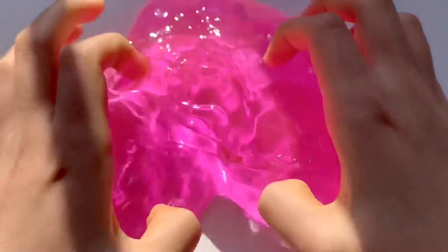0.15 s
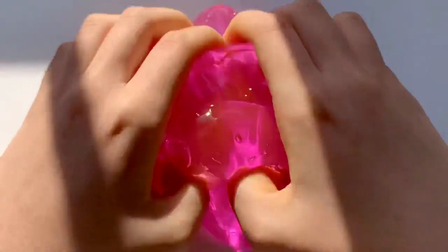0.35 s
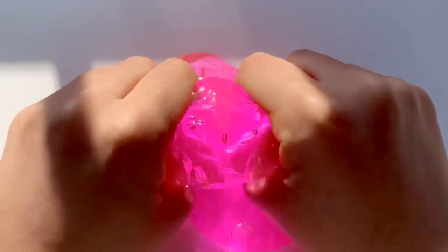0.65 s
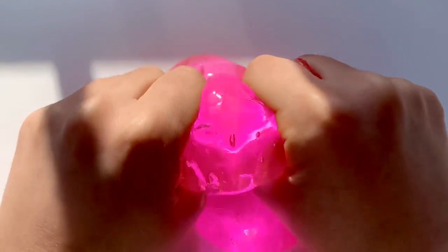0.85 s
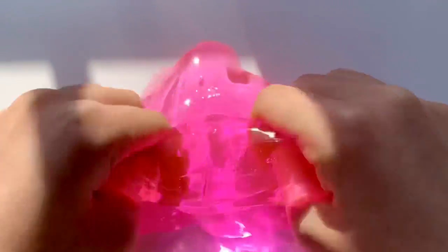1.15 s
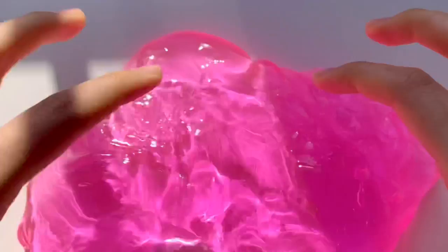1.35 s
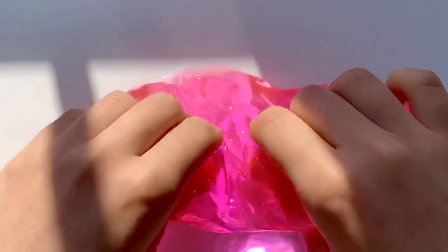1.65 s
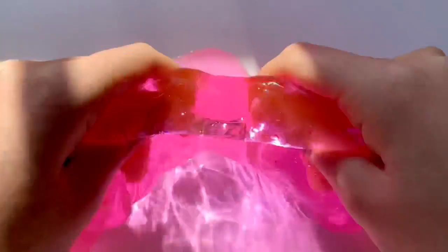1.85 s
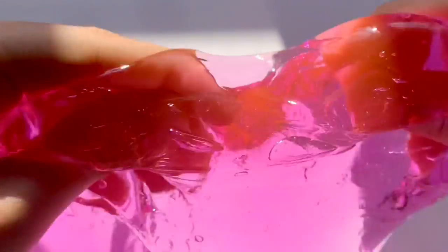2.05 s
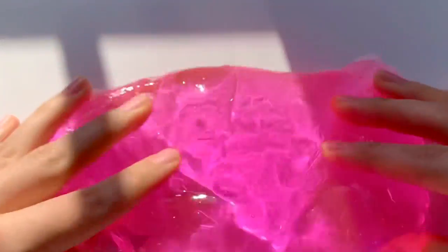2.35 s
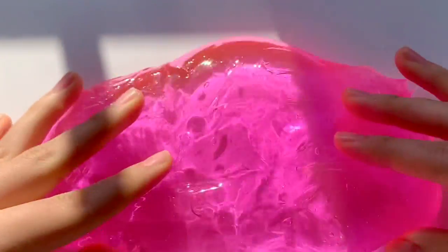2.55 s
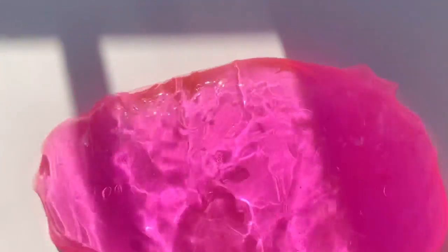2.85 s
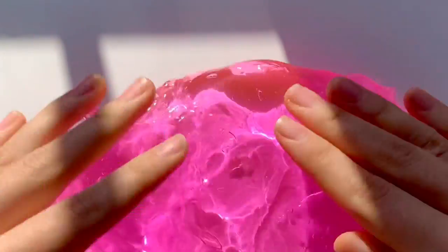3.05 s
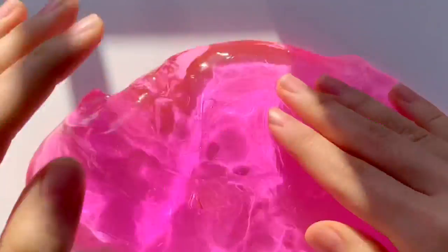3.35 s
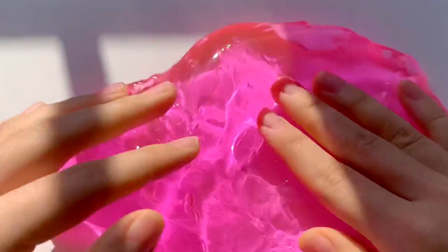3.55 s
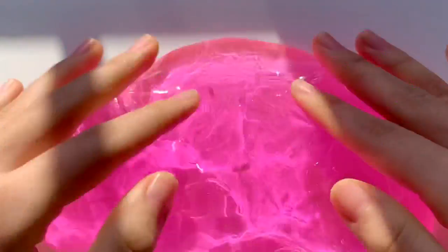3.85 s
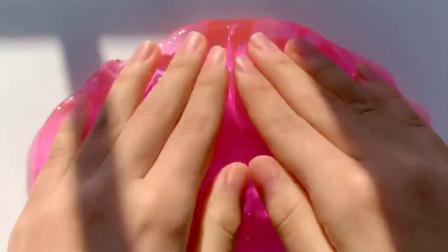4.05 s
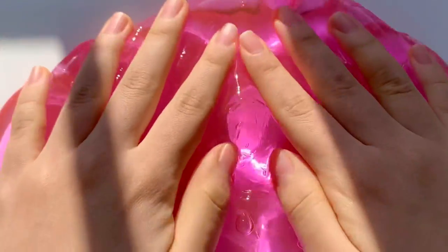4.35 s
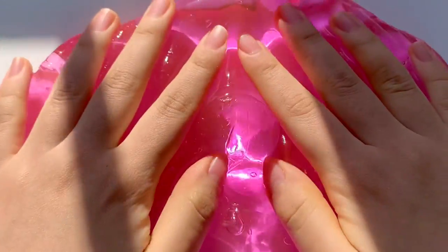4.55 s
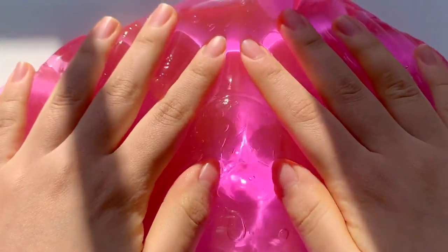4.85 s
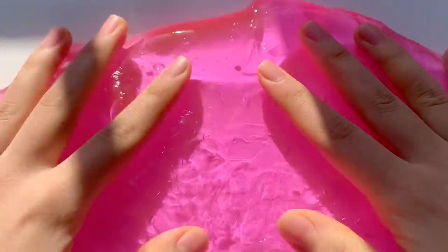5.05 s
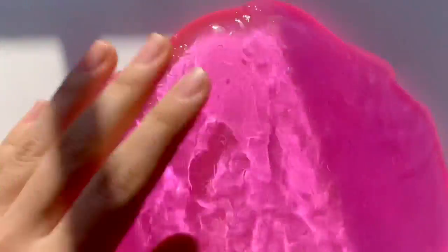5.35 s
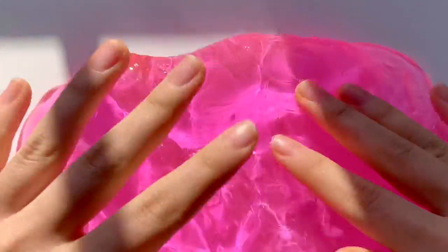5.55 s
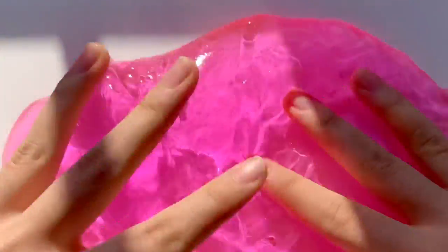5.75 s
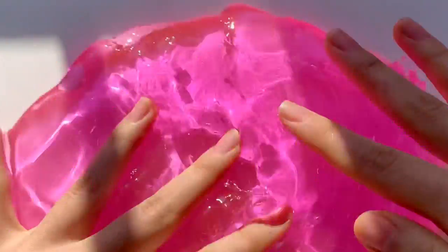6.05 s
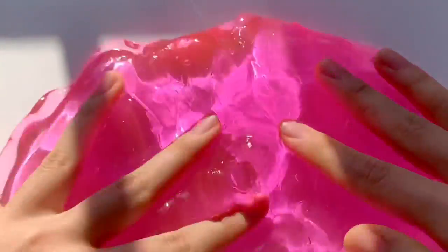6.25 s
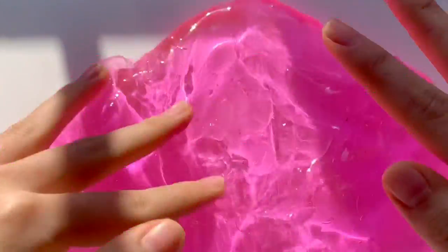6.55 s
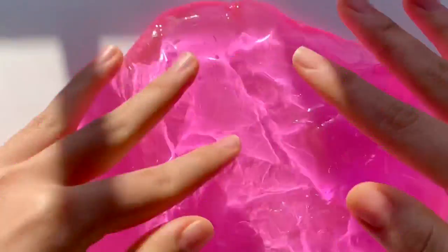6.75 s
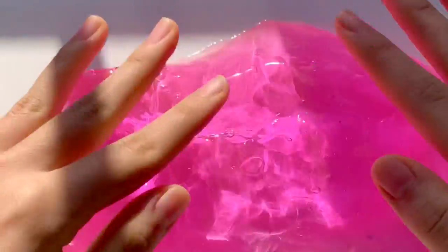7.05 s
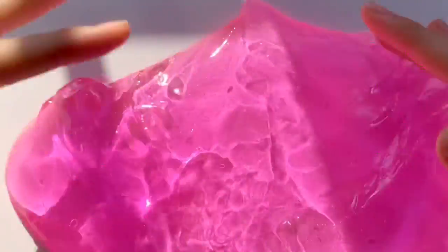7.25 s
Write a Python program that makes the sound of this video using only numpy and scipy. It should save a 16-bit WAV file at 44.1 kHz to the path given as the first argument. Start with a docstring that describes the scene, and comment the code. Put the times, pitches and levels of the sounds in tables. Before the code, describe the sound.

Hands knead and press wet slime on a table. Faint sticky crackles and squelches come first, then bright snapping films and hollow air pops arrive in quick clusters with soft low thuds. A pause follows around the middle, then a denser, louder run of crackling to the end. Close stereo microphone in a quiet small room.

```python
"""Wet slime on a table

Fingers pat, press and peel off a sheet of wet slime on a table, close to a small stereo recorder.
Sticky films snap as spikes with ringing noise, air pockets pop as damped tones or spatter, and the
wet skin sizzles and squelches as shaped noise. Each pat thuds through the modes of the table top.
Noise tails answer from the walls, over a low rumble, a wavering drone and the hush of a quiet room."""
import sys
import numpy as np
from scipy import signal
from scipy.fft import rfft, irfft, next_fast_len
from scipy.io import wavfile
from scipy.ndimage import map_coordinates

SR = 44100
rng = np.random.default_rng(int(sys.argv[2]) if len(sys.argv) > 2 else 0)


def wav_out(sig):
    """Save sig, one row per channel (or a flat mono array), as 16-bit PCM at SR to the path in sys.argv[1]."""
    wavfile.write(sys.argv[1], SR, np.round(np.clip(np.atleast_2d(sig).T, -1, 1) * 32767).astype(np.int16))


N = 326781


def amp(db):
    """Gain of a level in dB."""
    return 10 ** (np.asarray(db) / 20)


def unit(x):
    """Scaled to rms 1."""
    return x / np.sqrt(np.mean(x ** 2) + 1e-20)


def along(points, hz):
    """Values at hz, read between (Hz, value) points on a log frequency axis."""
    f, values = np.transpose(points)
    return np.interp(np.log(hz + 1), np.log(f + 1), values)


def curves(rows):
    """One value per sample for each column after the time."""
    s, *columns = np.transpose(rows)
    return [np.interp(np.arange(N) / SR, s, column) for column in columns]


def wobble(rate):
    """A smooth random curve, rate knots a second."""
    knots = rng.standard_normal(int(N * rate / SR) + 4)
    return map_coordinates(knots, [np.arange(N) * rate / SR])


def filtered(x, response):
    """x times a complex response of frequency."""
    m = next_fast_len(x.shape[-1] + 4096)
    spectrum = rfft(x, m) * response(np.fft.rfftfreq(m, 1 / SR))
    return irfft(spectrum, m)[..., :x.shape[-1]]


def hiss(spectrum, alike):
    """Shaped stereo noise of rms 1; alike is the correlation of the two sides."""
    a, b = filtered(rng.standard_normal((2, N)), lambda hz: amp(along(spectrum, hz)))
    turn = np.arccos(alike) / 2
    left = np.cos(turn) * a + np.sin(turn) * b
    right = np.cos(turn) * a - np.sin(turn) * b
    return unit(np.array([left, right]))


def place(s, rows, pan_db):
    """One row of sound at each time; what is louder on the left also gets there first."""
    right_lag = np.round(np.clip(pan_db, 0, 6) * 1.6).astype(int)  # samples
    at = np.round(s * SR).astype(int)[:, None] + np.arange(rows.shape[1])
    sides = []
    for index, db in [(at, pan_db / 2), (at + right_lag[:, None], -pan_db / 2)]:
        panned = rows * amp(db)[:, None]
        sides.append(np.bincount(index.ravel(), panned.ravel(), N + SR)[:N])
    return np.array(sides)


# Films tearing off the skin, the ones that stand out.
# Each row: tear in seconds, level in dB, ring of the little cavity in Hz.
FILM_SNAPS = [(.055, -40, 4650), (.1204, -37.5, 5500), (.2271, -20, 6660), (.2724, -32, 7040),
              (.2818, -12, 7200), (.3879, -39, 7300), (.4296, -41, 14800), (.486, -39, 9300),
              (.9526, -40.5, 13600), (1.025, -42, 6400), (1.0393, -30, 7540), (1.0628, -38, 8300),
              (1.105, -37, 3220), (1.1609, -44, 3900), (1.179, -47, 7100), (1.3117, -37, 4800),
              (1.3484, -40, 5700), (1.3898, -38, 3700), (2.0008, -14.5, 7500), (2.0578, -35, 9200),
              (2.0716, -31.5, 8700), (2.0832, -12, 6550), (2.0856, -10, 10500), (2.456, -28.5, 3700),
              (2.8548, -15.5, 10300), (2.859, -3.5, 9500), (2.8641, -15, 8950), (2.8956, -12.5, 7900),
              (2.9375, -21, 9100), (2.9408, -11, 10100), (2.9646, -22, 4100), (2.9946, -21, 7250),
              (3.0941, -15, 10500), (3.102, -24, 10500), (3.1122, -27, 12800), (3.1468, -35, 3470),
              (3.1648, -31, 10900), (3.1708, -22.5, 9200), (3.2262, -43, 11700), (3.2961, -43, 5800),
              (3.3236, -2.5, 8900), (3.3668, -18.5, 8600), (3.3846, -21.5, 8600), (3.5862, -11, 10900),
              (3.5905, 3.5, 10200), (3.603, -9.5, 7400), (3.608, -28, 9800), (3.6254, -13, 4330),
              (3.6486, -20, 8000), (3.7044, -36, 10960), (3.9197, -13, 9900), (3.9382, -9, 14400),
              (3.9516, -7.5, 8380), (4.313, -52, 11030), (4.3422, -48, 8360), (5.257, 0.5, 12800),
              (5.2616, -3, 12300), (5.3685, -6.5, 8900), (5.376, 7, 11200), (5.4596, -7, 11000),
              (5.4832, -21.5, 4260), (5.5996, -0.5, 13300), (5.611, -14.5, 8400), (5.6622, -26.5, 10500),
              (5.6822, -18.5, 8600), (5.6876, -18.5, 5100), (5.8025, -21, 8400), (5.8133, -11, 11200),
              (5.825, -10, 5130), (5.8379, -15, 4500), (5.8881, -12, 11100), (5.911, -16.5, 9050),
              (5.9212, -12.5, 4200), (5.9375, -24, 5030), (6.0373, -16.5, 6200), (6.0452, -10, 12300),
              (6.062, -14, 6840), (6.1028, -15, 11300), (6.1438, -20, 5600), (6.2695, -8, 9600),
              (6.2892, -19.5, 4560), (6.297, -8.5, 6660), (6.3241, -22, 9700), (6.363, -28, 6200),
              (6.4114, -35.5, 4900), (6.495, 4.5, 7100), (6.501, -8, 11400), (6.5173, -7.5, 4670),
              (6.5385, -18.5, 8000), (6.7508, -23.5, 14200), (6.7583, -.5, 12100), (6.7704, -13.5, 7900),
              (6.8167, -19, 3820), (6.9538, -16.5, 14100), (6.9832, -17.5, 7150), (6.9916, 0, 11100),
              (7.0017, -22, 10200), (7.0107, -10, 5200), (7.0641, -34, 6820), (7.2798, -45.5, 3810),
              (7.3656, -32, 5100)]
TEAR_T60_S, TEAR_SPREAD = .011, .3  # typical decay by 60 dB, and its log scatter
SOFT_EDGE_S = .008  # room for the soft edge ahead of the spike


def snaps():
    """A film tears: a spike in a short burst of noise, coloured by its cavity."""
    s, db, hz = np.transpose([*FILM_SNAPS, *crackle(count=350)])
    scatter, pan_db = rng.standard_normal((len(s), 2)).T
    t60 = TEAR_T60_S * np.exp(TEAR_SPREAD * scatter)
    t, cavity = np.arange(1536) / SR - SOFT_EDGE_S, hz[:, None]
    after = np.clip(t, 0, None)
    tear = amp(-60 * after / t60[:, None]) + 0.74 * amp(-60 * after / 0.0013)
    tear = tear * (1 - np.exp(-after / 0.00008))
    soft_edge = 0.25 * amp(-60 * np.abs(t) / .014)
    burst = rng.standard_normal((len(s), len(t))) * (tear + soft_edge)
    burst = burst + 4 * np.exp(-((t - .0004) / .00003) ** 2)  # the instant of rupture

    def ring(f, width):
        return 1j * f * width * cavity / (cavity ** 2 - f * f + 1j * f * width * cavity)

    def colour(f):
        thin = (1j * f / (1800 + 1j * f)) ** 2  # takes the body out below 1800 Hz
        return (.1 + 1.6 * ring(f, 0.22) + 3.5 * ring(f, 0.41)) * thin

    rows = filtered(burst, colour)
    rows = rows / np.abs(rows).max(axis=1, keepdims=True)
    return place(s - SOFT_EDGE_S, rows * amp(db + 0.5)[:, None], 2.5 * pan_db)


CRACKLE_DB, CRACKLE_SPREAD_DB = 10, 3.5  # least level over the sizzle, and the random excess


def crackle(count):
    """Small tears at random moments that follow the sizzle of the strokes: rows like FILM_SNAPS."""
    low, high = [.01, np.log(3500), 1e-3], [N / SR, np.log(13000), 1]
    s, log_hz, size = rng.uniform(low, high, (count, 3)).T
    sizzle_db = 20 * np.log10(strokes()[0][(s * SR).astype(int)] + 1e-9)
    db = sizzle_db + CRACKLE_DB - CRACKLE_SPREAD_DB * np.log(size)
    return np.transpose([s, db, np.exp(log_hz)])


# Air pockets bursting in the slime.
# Each row: burst in seconds, level in dB, pitch in Hz, decay by 60 dB in seconds,
# left over right in dB, share of clear tone from 0 to 1.
POCKET_POPS = [(0.2998, -33.5, 4770, 0.024, -15.5, 1), (1.105, -41, 3510, 0.018, -9, 1),
               (1.161, -47, 2640, 0.063, -9, 0.04), (1.388, -33, 2660, 0.095, 2.5, 0),
               (1.9749, -36, 1710, 0.04, 5, 0), (1.9982, -26, 2960, 0.063, 4, 0.02),
               (2.082, -12, 2750, 0.04, 4, 0.2), (2.4545, -31, 2180, 0.041, 3, 0.2),
               (2.881, -37, 1640, 0.22, 12.5, 0.08), (2.8962, -32.5, 1570, 0.053, -16, 0.03),
               (2.943, -29, 1554, 0.048, -3, 0.25), (2.9645, -22, 2860, 0.012, -6, 0.25),
               (2.9931, -28, 1720, 0.027, -3, 0.1), (3.044, -45, 745, 0.031, 4, 1),
               (3.094, -27.5, 2470, 0.039, 4.5, 0), (3.173, -29, 2020, 0.011, -5, 0.4),
               (3.227, -37.5, 1540, 0.014, 2, 0.04), (3.323, -22.5, 3000, 0.032, 4, 0.13),
               (3.334, -28, 3000, 0.02, 0.5, 0.3), (3.367, -11.5, 1600, 0.012, -5, 0.15),
               (3.404, -32.5, 1590, 0.052, -5, 0), (3.4316, -35, 1470, 0.023, 6, 0.2),
               (3.5903, 1, 1533, 0.01, 2, 0.09), (3.5973, -17.5, 1490, 0.048, -5, 0.06),
               (3.6258, -19, 1900, 0.015, 2, 0.9), (3.6464, -12, 1880, 0.033, 4, 0.3),
               (3.9302, -24, 1570, 0.026, 4.5, 0), (3.94, -20.5, 1910, 0.014, -11.5, 0.4),
               (3.9498, -7, 3080, 0.014, 1.5, 0.2), (3.9517, -5.5, 1620, 0.02, 1.5, 0.1),
               (4.4239, -47, 2205, 0.0091, -3, 0.17), (5.2538, -22, 1130, 0.046, 3, 0),
               (5.258, -24, 620, 0.027, 9, 0.35), (5.2832, -26.5, 1890, 0.022, 9, 0.9),
               (5.375, -16.5, 1830, 0.033, 1, 0.25), (5.3805, -29.5, 865, 0.038, 13, 0.5),
               (5.4048, -17, 1650, 0.009, 1.5, 0.3), (5.4061, -30, 1060, 0.039, 3.5, 0.6),
               (5.4565, -19.5, 850, 0.035, 3, 0.04), (5.4826, -30, 1544, 0.11, 3.5, 0.06),
               (5.6016, -20.5, 1530, 0.061, 1, 0), (5.6313, -18.5, 1760, 0.014, -2, 0.93),
               (5.6982, -28.5, 1870, 0.039, 4.5, 0.2), (5.7384, -46, 785, 0.048, 7, 0.5),
               (5.816, -23, 1815, 0.044, -5.5, 0.17), (5.825, -25, 2300, 0.032, 1, 0.2),
               (5.8379, -29, 1600, 0.023, -1.5, 0.3), (5.886, -36, 920, 0.07, 8, 0.13),
               (5.9202, -17.5, 2000, 0.039, 6, 0.04), (6.041, -33.5, 890, 0.039, 8, 0.47),
               (6.0449, -27.5, 1990, 0.039, -7, 0.08), (6.061, -12, 2500, 0.017, 4.5, 0.04),
               (6.1042, -32, 1280, 0.035, 3, 0.4), (6.147, -23, 1804, 0.047, 4, 0.1),
               (6.2705, -29.5, 810, 0.041, 12, 0.4), (6.273, -23, 1140, 0.067, -6.5, 0),
               (6.2965, -26, 1770, 0.014, 24, 0.3), (6.324, -26.5, 1220, 0.024, 6, 0.23),
               (6.3558, -29.5, 1530, 0.063, -17, 0), (6.3634, -9.5, 1530, 0.0042, 6.5, 0.23),
               (6.5228, -11.5, 1740, 0.012, 1.5, 0.7), (6.7588, -12.5, 1930, 0.0097, -5.5, 0.63),
               (6.7884, -19, 2300, 0.012, 12, 0.3), (6.8162, -21.5, 1860, 0.022, 16.5, 0.02),
               (6.9548, -24.5, 1680, 0.01, -4.5, 0.01), (6.984, -18, 1350, 0.0063, -17, 0),
               (6.9937, -26, 1550, 0.027, 3.5, 0.6), (7.0147, -17, 1130, 0.06, 4, 0),
               (7.017, -21, 1835, 0.03, -6.5, 1), (7.267, -31, 2700, 0.027, 2, 0)]


def pops():
    """A pocket rings as a damped tone rising as its mouth opens, or spatters around that pitch."""
    s, db, hz, t60, pan_db, clear = np.transpose([*POCKET_POPS, *blobs(count=500)])
    t, pitch, clear = np.arange(3072) / SR, hz[:, None], clear[:, None]
    tone = np.sin(2 * np.pi * pitch * (.98 * t + 3 * t * t))

    def ring(f):
        return (1j * f * .7 * pitch / (pitch ** 2 - f * f + 1j * f * pitch)) ** 2

    spatter = filtered(rng.standard_normal((len(s), len(t))), ring)
    spatter = spatter / spatter.std(axis=1, keepdims=True)
    shape = amp(-60 * t / t60[:, None]) * (1 - np.exp(-t / 0.00035))
    mix = np.sqrt(clear) * tone + 0.35 * np.sqrt(1 - clear) * spatter
    return place(s, mix * shape * amp(db + 5.0)[:, None], pan_db)


BLOB_DB, BLOB_SPREAD_DB = 7, 5.5  # least level over the squelch gain, and the random excess
BLOB_CYCLES = 7.3  # cycles to die by 60 dB


def blobs(count):
    """Small pockets bursting at random that follow the squelch of the strokes: rows like POCKET_POPS."""
    low, high = [.01, np.log(600), 1e-3, -8, 0], [N / SR, np.log(3000), 1, 10, .7]
    s, log_hz, size, pan_db, clear = rng.uniform(low, high, (count, 5)).T
    squelch_db = 20 * np.log10(strokes()[1][(s * SR).astype(int)] + 1e-9)
    db = squelch_db + BLOB_DB - BLOB_SPREAD_DB * np.log(size)
    hz = np.exp(log_hz)
    return np.transpose([s, db, hz, BLOB_CYCLES / hz, pan_db, clear])


# Tone of the sizzle and of the squelch. Each row: frequency in Hz, relative level per Hz in dB.
SIZZLE_TONE = [(1500, -43.5), (3000, -3.5), (5000, 0), (8000, 4.5), (12000, -7.5), (16000, -3.5)]
SQUELCH_TONE = [(300, -15.5), (600, -0.5), (1000, -6), (1800, 0.5), (2600, -5), (4000, -27.5)]


def knead():
    """Countless tiny films tear under moving skin: grainy noise, and a duller squelch with bubbles."""
    sizzling, squelching = strokes()
    grains = unit(amp(3.5 * wobble(700) + 1.5 * wobble(90)))
    squelch = 0.56 * hiss(SQUELCH_TONE, 0.14) + 0.12 * bubbles(count=1500)
    return sizzling * grains * hiss(SIZZLE_TONE, 0.29) + squelching * squelch


# Skin sliding on and peeling off the slime.
# Each row: moment of full strength in seconds, hold in seconds, fade of the sizzle by 60 dB in seconds,
# sizzle gain in dB, squelch gain in dB.
SKIN_STROKES = [(0, 0.0021, 0.086, -48, -48), (0.113, 0.069, .2, -63, -62.5),
                (0.237, 0.031, 0.19, -37, -47.5), (1.023, 0.09, 0.34, -55.5, -63),
                (1.109, 0.0054, 0.058, -44.5, -53), (1.322, 0.05, 0.11, -57.5, -60.5),
                (1.388, 0.0086, 0.072, -44.5, -46.5), (1.708, 0.025, 0.58, -64, -70),
                (2.012, .004, 0.22, -48.5, -54), (2.087, .004, 0.18, -38.5, -41.5),
                (2.465, .004, 0.15, -61.5, -45.5), (2.873, 0.0044, 0.6, -48.5, -46.5),
                (3.1, 0.086, .25, -57.5, -49.5), (3.361, 0.0028, 0.26, -44.5, -36.5),
                (3.47, 0.12, 0.21, -72.5, -57), (3.603, 0.0043, 0.19, -29, -39.5),
                (3.941, 0.0033, 0.2, -35.5, -32.5), (4.881, 0.12, .11, -62, -67),
                (5.263, 0.0032, 0.33, -42.5, -42.5), (5.406, .004, 0.21, -35.5, -42.5),
                (5.612, 0.0045, 0.31, -39.5, -37), (5.815, .004, 0.92, -47.5, -44.5),
                (6.038, .004, 0.59, -53, -40.5), (6.29, 0.0032, 0.19, -37, -52.5),
                (6.501, 0.0059, 0.22, -34, -51.5), (6.761, 0.0084, 0.22, -34.5, -37.5),
                (6.981, 0.0032, 0.26, -39, -39), (7.269, 0.11, 0.25, -57, -56), (7.33, .03, .2, -53, -47),
                (7.363, .05, .2, -38.5, -36)]
RISE_DB_PER_S, SQUELCH_LINGERS = 901, 1.2  # shared swell speed; the squelch fades 1.2 times as long


def strokes():
    """Gains of sizzle and squelch: each stroke swells, holds and fades."""
    s, hold, t60, sizzle_db, squelch_db = np.transpose(SKIN_STROKES)[..., None]
    t = np.arange(0, N, 32) / SR
    swell = RISE_DB_PER_S * np.clip(s - t, 0, None)
    fade = 60 * np.clip(t - s - hold, 0, None) / t60
    sizzle = amp(sizzle_db - swell - fade)
    squelch = amp(squelch_db - swell - fade / SQUELCH_LINGERS)
    # overlapping strokes add by power
    return [np.interp(np.arange(N) / SR, t, np.linalg.norm(g, axis=0)) for g in (sizzle, squelch)]


def bubbles(count):
    """Small pockets gurgling all through the slime: damped tones that glide up, rms 1."""
    low, high = [0, np.log(330), -14, -3], [N / SR, np.log(2400), 0, 6]
    s, log_hz, size_db, pan_db = rng.uniform(low, high, (count, 4)).T
    cycles = np.exp(log_hz)[:, None] * np.arange(1024) / SR
    tone = np.sin(2 * np.pi * cycles * (1 + 0.011 * cycles))
    shape = amp(size_db[:, None] - 60 * cycles / 22) * (1 - np.exp(-cycles / .7))
    return unit(place(s, tone * shape, pan_db))


# Pats on the table. Each row: start in seconds, level in dB, upper modes in dB against that level,
# wet slap in dB against that level, thump in Hz.
TABLE_PATS = [(.019, -44, -16, -1, 55), (0.127, -49, 7.5, -1.5, 60), (0.187, -42, -4, 3, 54),
              (0.222, -41, 2.5, 6.5, 75), (1.151, -49, -0.5, -1, 54), (1.316, -34.5, -10, -19.5, 73),
              (2.003, -26, -7, -8.5, 73), (2.077, -37.5, 1.5, 2, 55), (2.455, -55, -11, 8, 77),
              (2.853, -19, -9, -3, 81), (2.936, -17, -24, -22, 54), (3.094, -27, -2.5, -5.5, 54),
              (3.17, -26.5, -2.5, -10, 53), (3.327, -20.5, -7.5, -5.5, 58), (3.4, -23, -15, -14.5, 54),
              (3.58, -25.5, -7, 1, 78), (3.645, -42, 0.5, 10, 54), (3.936, -29.5, -1.5, 0.5, 83),
              (5.252, -18.5, -2, -3, 82), (5.366, -18, -8, -5.5, 77.6), (5.454, -19.5, -8.5, -9, 83.3),
              (5.599, -12.5, -5, -12.5, 69), (5.69, -30, -5, -4.5, 54), (5.813, -14.5, -8, -9.5, 76),
              (5.889, -36.5, 6, 3.5, 83), (6.045, -23.5, -2.5, -8.5, 72), (6.108, -19.5, -10.5, -11.5, 53),
              (6.149, -26, -15, -15, 53), (6.273, -14, -6.5, -15, 82), (6.329, -21.5, -2.5, -8.5, 54),
              (6.493, -20, -1.5, -4.5, 60.4), (6.599, -32.5, -1.5, -12.5, 54), (6.76, -17, -7, -6.5, 53),
              (6.974, -17.5, -3, -6.5, 82), (7.098, -25, -10, -17.5, 54), (7.27, -36.5, -14, 3.5, 68)]
# Table top bending. Each row: typical frequency in Hz, typical level in dB, decay by 60 dB in seconds.
UPPER_MODES = [(109.5, -3, 0.013), (129.04, 0, 0.28), (154.5, -2, 0.23)]
# Slowest mode of the table, one row with the same columns.
SWAY_MODE = (44, 0.33, 0.46)
# Tone of the wet slap. Each row: frequency in Hz, relative level per Hz in dB.
SLAP_TONE = [(130, -28), (200, 4), (245, 3), (310, -7), (400, -6), (480, -11.5), (600, -8), (860, -10.5),
             (1100, -22.5), (3000, -33.5)]
PUSH_S = .023  # from the start of a pat to the height of its push


def table():
    """A pat is a soft push: a swelling thump, table modes at new strengths and a dull, wet slap."""
    thuds, slaps, t = np.zeros(N + SR), np.zeros(N + SR), np.arange(SR // 2) / SR

    def ring(hz, db, t60):
        decay = amp(db + rng.normal(0, 1.5) - 60 * t / t60)
        return decay * np.sin(2 * np.pi * hz * rng.normal(1, .03) * t)

    push = (t / PUSH_S) ** 2 * np.exp(1 - (t / PUSH_S) ** 2)
    rise = 1 - np.exp(-(t / (0.29 * PUSH_S)) ** 2)
    for s, db, upper_db, slap_db, thump_hz in TABLE_PATS:
        start = round(s * SR)
        thump = 0.72 * push * np.sin(2 * np.pi * thump_hz * t)
        sway = ring(*SWAY_MODE) * (1 - np.exp(-t / 0.051))
        upper = amp(upper_db) * rise * sum(ring(*mode) for mode in UPPER_MODES)
        thuds[start:][:len(t)] += amp(db + 1.0) * (thump + sway + upper)
        slap = amp(db + slap_db - 5.0 - 60 * t / 0.27) * (1 - np.exp(-t / 0.0011))
        slaps[start:][:len(t)] += slap
    # the slap noise is 1 dB louder on the left and 1 dB softer on the right
    return thuds[:N] + slaps[:N] * amp([[1], [-1]]) * hiss(SLAP_TONE, .7)


# Decay of the room. Each row: frequency in Hz, decay by 60 dB in seconds.
ROOM_DECAY = [(300, 0.1), (1200, 0.24), (1850, 0.24), (2600, 0.2), (16000, 0.013)]
ROOM_DB, POPS_IN_ROOM_DB = -7.5, -8  # the walls' answer; pops, cupped under the hands, reach them less


def room(x):
    """The walls answer; each stretch of .25 s gets its own noise tail, dying by frequency."""
    out, step = np.zeros((2, N + SR)), SR // 4
    for i in range(0, N, step):
        hz, t, z = signal.stft(rng.standard_normal((2, SR // 3)), SR, nperseg=256)
        decay = amp(-60 * t / along(ROOM_DECAY, hz)[:, None])
        tail = signal.istft(z * decay, SR, nperseg=256)[1]
        wet = signal.fftconvolve(x[None, i:i + step], tail / np.linalg.norm(tail[0]), axes=1)
        out[:, i + 150:i + 150 + wet.shape[1]] += wet  # 150 samples on the way
    return out[:, :N]


SHAKE_RISE_S, SHAKE_T60_S = 0.079, 0.88  # swell constant and decay by 60 dB


def shake():
    """How hard the table still trembles from the pats so far."""
    s, db = np.transpose(TABLE_PATS)[:2, :, None]
    t = np.arange(0, N, 32) / SR
    after = np.clip(t - s, 0, None)
    tremble = amp(db - 60 * after / SHAKE_T60_S) * (1 - np.exp(-after / SHAKE_RISE_S))
    return np.interp(np.arange(N) / SR, t, np.linalg.norm(tremble, axis=0))


# The building's own rumble and drone. Each row: time in seconds, rumble in dB, drone in dB.
BUILDING_LEVELS = [(0, -45.5, -46.5), (.15, -57.5, -73.5), (.87, -70, -66.5), (1.42, -54.5, -61),
                   (1.9, -66, -69), (2.45, -70, -59), (2.8, -61, -57), (4.4, -67.5, -58.5), (5.2, -55, -60),
                   (7.41, -60, -50)]
# Tone of the rumble, the drone and the room hush.
# Each row: frequency in Hz, relative level per Hz in dB.
RUMBLE_TONE = [(20, -46), (33, -7), (45, 11.5), (70, 1.5), (95, -2), (130, -61)]
DRONE_TONE = [(80, -34), (110, 12), (140, 12.5), (170, 11.5), (230, -48)]
HUSH_TONE = [(150, -21.5), (250, -1.5), (500, -12), (1000, -21), (2000, -20.5), (4000, -26), (8000, -23),
             (16000, -26.5)]
SHAKE_RUMBLE_DB, SHAKE_DRONE_DB = -12, -15  # what the trembling table adds, against shake()


def background():
    """Rumble and a wavering drone from the building and the trembling table, over room hush."""
    rumble_db, drone_db = curves(BUILDING_LEVELS)
    trembling = shake()
    rumble = np.hypot(amp(rumble_db), amp(SHAKE_RUMBLE_DB) * trembling)
    drone = np.hypot(amp(drone_db), amp(SHAKE_DRONE_DB) * trembling)
    hush = amp(-67.0) * hiss(HUSH_TONE, 0.31)
    return rumble * hiss(RUMBLE_TONE, 0.9) + drone * hiss(DRONE_TONE, 0.9) + hush


def scene():
    """Slime, table and room."""
    skin, pockets = snaps() + knead(), pops()
    to_walls = (skin + amp(POPS_IN_ROOM_DB) * pockets).mean(axis=0)
    return skin + pockets + amp(ROOM_DB) * room(to_walls) + table() + background()


TREBLE_LAG_S, TOP_HZ = 1 / 4650, 16000  # delay of the left treble; end of the band


def record(dry):
    """The right capsule gives most treble to both sides, late on the left; bass is cut, peaks clip."""

    def high(hz):
        return 1 / (1 + (6000 / (hz + 1)) ** 8)

    def late(hz):
        return np.exp(-2j * np.pi * hz * np.array([[TREBLE_LAG_S], [0]]))

    def bass_cut(hz):
        return 1 / (1 + (37 / (hz + 1)) ** 24)

    body = filtered(dry, lambda hz: bass_cut(hz) - high(hz))
    treble = filtered(dry[1] + 0.46 * dry, lambda hz: 0.79 * high(hz) * late(hz))
    clipped = np.clip(body + treble, -1, 1)
    return filtered(clipped, lambda hz: 1 / (1 + (hz / TOP_HZ) ** 60))


dry = scene()
out = record(dry)
wav_out(out)
```